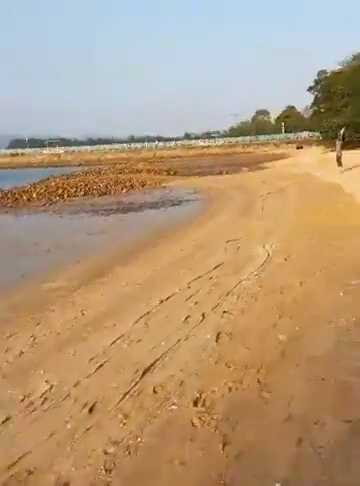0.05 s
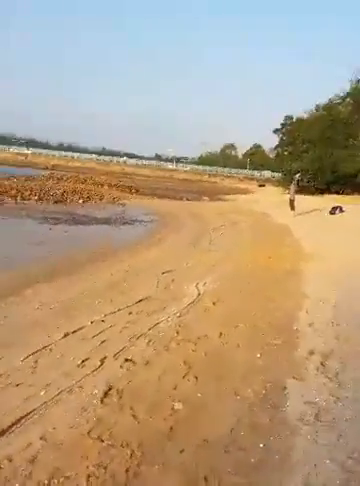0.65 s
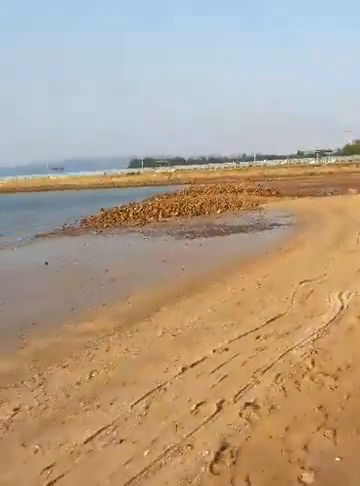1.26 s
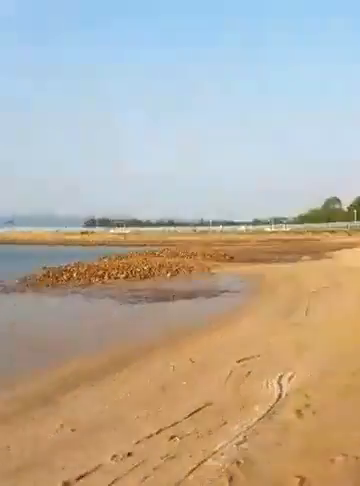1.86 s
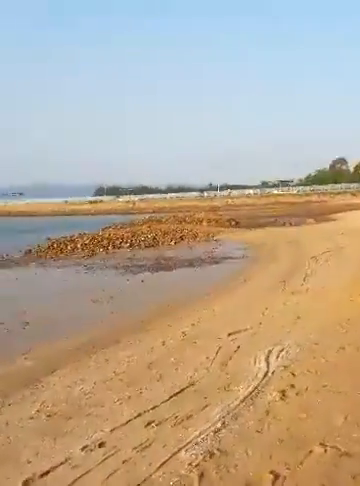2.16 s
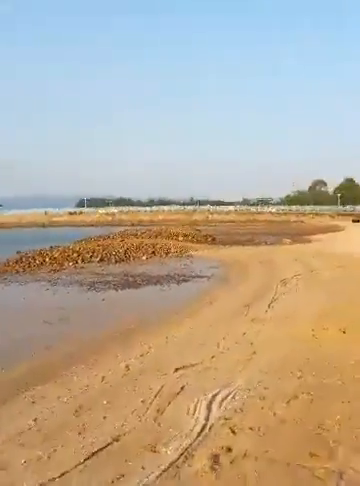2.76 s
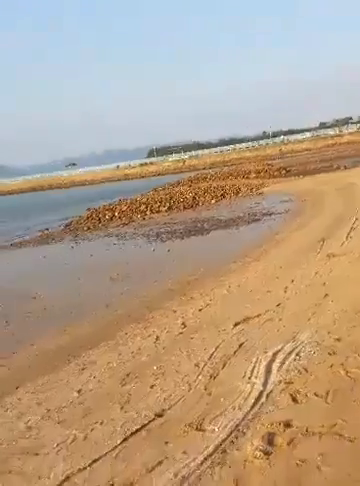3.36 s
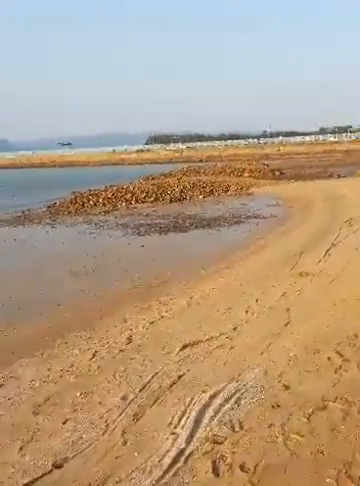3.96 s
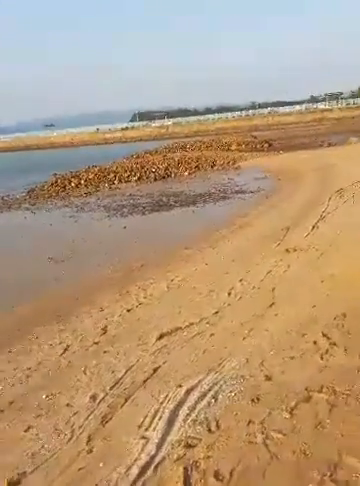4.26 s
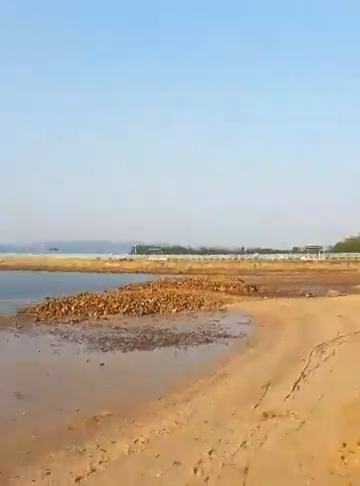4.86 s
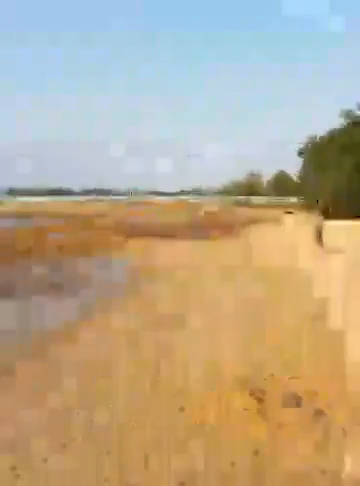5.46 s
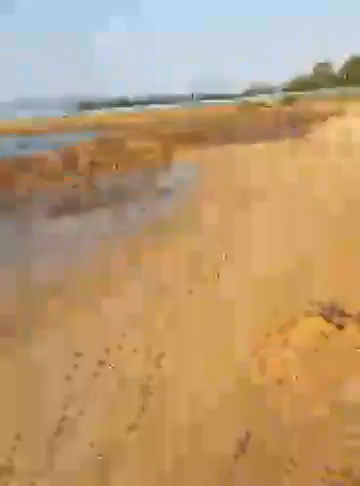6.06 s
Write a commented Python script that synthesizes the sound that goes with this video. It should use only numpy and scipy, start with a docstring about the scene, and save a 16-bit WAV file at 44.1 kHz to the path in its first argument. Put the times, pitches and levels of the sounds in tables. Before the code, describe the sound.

Footsteps cross coarse beach sand, each giving a short, grainy crunch with small snaps. The stride jolts the handheld phone, so dull, close knocks and thumps come unevenly throughout and stand out as the loudest sounds. A light breeze rumbles on the microphone over a faint, even hiss. Near the end the hiss drops and the wind eases. The open air has no echo.

```python
"""A walk along a beach of coarse sand, phone in hand, a light breeze rumbling on the microphone over hiss.
From 0.2 s on, jolts of the stride knock dully on the case and bounce it in the hand, while sand
gives way in short swells of grains with sharp snaps. The hardest knocks fall near 2.0, 4.3, 5.2, 5.5 s.
At 5.5 s the hiss sinks and stays down; at 6.1 s, as the breeze fades, a far bird calls two faint notes."""
import sys
import numpy as np
from scipy import signal
from scipy.fft import rfft, irfft
from scipy.io import wavfile
from scipy.ndimage import uniform_filter1d, minimum_filter1d

SR = 44100
rng = np.random.default_rng(int(sys.argv[2]) if len(sys.argv) > 2 else 0)


def transcribe(signal):
    """Save signal, clipped to [-1, 1], as a 16-bit WAV file at the path in sys.argv[1]."""
    frames = np.atleast_2d(signal).T
    limited = np.clip(frames, -1, 1)
    pcm = np.round(limited * 32767).astype(np.int16)
    wavfile.write(sys.argv[1], SR, pcm)


N = 273861
TIME_S = np.arange(N) / SR

# jolts of the stride: t/s, strength/dB, contact corner/Hz (low = soft), grip (factor on bounce pitch)
JOLTS = [(0.1845, -15, 1102, .91), (0.311, -21, 450, 0.94), (0.348, -21.5, 330, 0.5),
         (0.521, -29, 600, 1.35), (0.715, -23.5, 200, .5), (1.2288, -7.5, 1770, 0.94),
         (1.4803, -16, 910, 0.97), (1.6764, -9.5, 1900, 1.02), (1.9828, -13, 330, 0.91),
         (2.0106, -1, 3040, 1.03), (2.1198, -15.5, 590, 0.75), (2.271, -15.5, 800, 0.96),
         (2.284, -20, 540, 1.43), (2.473, -14, 800, 1.03), (2.777, -13.5, 483, 0.75),
         (2.8097, -14, 12300, 1), (2.829, -4.5, 1820, 1.01), (2.872, -4.5, 340, 0.82),
         (3.007, -12, 298, 0.63), (3.034, -9, 3770, 0.95), (3.041, -5.5, 330, 0.48),
         (3.2685, -12.5, 1400, 1), (3.6770, -10.5, 1000, 0.95), (4.171, -18, 520, 0.93),
         (4.2690, -0.5, 11300, 1), (4.3237, -15.5, 1210, .94), (4.6703, -17, 700, 0.92),
         (4.682, -17.5, 800, 2.14), (5.0061, -10.5, 864, 1.08), (5.054, -14.5, 400, .5),
         (5.163, -18.5, 724, 0.77), (5.2050, -1.1, 5700, 1), (5.235, -13, 300, 0.85),
         (5.496, 1, 5440, 1.21), (5.534, -7.5, 1490, 0.86), (6.069, -18, 295, 0.59)]


def case_knocks(sway_db=16.5, soft_sway_db=17.5, soft_hz=700, spread_hz=2400, size=8192):
    """Each jolt rings the phone; soft contact omits the upper modes, a firm grip quickens the bounce."""
    # case modes: f/Hz, width/Hz, level/dB, direction at the microphone (+-1)
    case_modes = [(352, 36.4, 24.5, 1), (511, 64, 19, 1), (623, 95, 25, 1), (818, 130, 19.5, 1),
                  (1140, 1100, -6, -1), (1350, 97, 11, -1), (1820, 1350, 3.5, -1), (2530, 210, 3, 1)]
    # bounce in the hand: f/Hz, width/Hz, level/dB, direction at the microphone (+-1)
    hand_modes = [(183.4, 91.3, 42, 1), (201.8, 117.3, 35.5, -1)]
    f = np.fft.rfftfreq(size, 1 / SR)
    # the port leaks slow pressure; the hand damps the top
    port = signal.freqs(*signal.butter(2, 91, "high", analog=True), f)[1] ** 2
    damping = undb(-22) + 1 / np.sqrt(1 + (f / 4200) ** 20)
    # high waves outrun low ones in the thin shell
    dispersion = (spread_hz - 1j * f) / (spread_hz + 1j * f)
    node = 1 - resonance(f, hz=2200, width_hz=260)  # microphone near a node of the case
    case = modal_response(f, case_modes)
    arm = resonance(f, hz=58, width_hz=50)
    lead = size // 8
    out = np.zeros(N + size)
    for t_s, strength_db, contact_hz, grip in JOLTS:
        push = undb(strength_db) / (1 + .5 * (f / contact_hz) ** 2) ** 4
        body = port * node * dispersion * (modal_response(f, hand_modes, grip) + case)
        softness = 1 / (1 + (contact_hz / soft_hz) ** 2)
        sway = undb(sway_db + soft_sway_db * softness) * arm  # slow pushes move the whole arm
        knock = irfft(push * damping * (body + sway))
        start = int(t_s * SR) - lead
        out[start:start + size] += np.roll(knock, lead)
    return out[:N]


def sand_crunches(half_s=0.0088, skirt_db=-14, shuffle_db=-63, crack_db=17.5, jitter_s=0.000984):
    """Fine grains slip in a swell, two coarse ones crack, one snaps; loose sand shuffles between steps."""
    # sand giving way: snap t/s, snap peak/dB, grain level/dB, lead of the swell/s
    crunches = [(0.2737, -14, -39.5, .013), (0.4620, -14, -41.5, 0.01), (0.791, -46, -59.5, 0),
                (1.2838, -33, -47.5, 0.00058), (1.9113, -16, -48, 0.02), (2.1512, -19.5, -41, 0.021),
                (2.3187, -24, -44.5, 0), (2.6158, -23, -46.5, 0.0087), (2.9036, -24.5, -42, .009),
                (3.046, -30, -46, 0.0047), (3.7086, -20, -43, 0.0034), (3.7255, -20, -62, 0.006),
                (3.9931, -28, -54.5, 0.00067), (4.1399, -19, -53, .012), (4.6960, -14.5, -41, 0.014),
                (5.0838, -13.5, -38, 0.0076), (5.3867, -27.5, -51.5, .004), (5.4160, -26, -69, 0.015),
                (5.8330, -34.5, -53.5, 0.0038), (6.0027, -18.5, -43, 0.0058)]
    # snap spectrum: f/Hz, level/dB
    snap_spectrum = [(30, -26.5), (100, 4), (210, 3), (400, -2.5), (1000, -12), (2500, -19), (6000, -40),
                     (10000, -38), (14000, -65)]
    # grain spectrum: f/Hz, level/dB
    grain_spectrum = [(40, 8.5), (200, 4), (700, -4), (1500, -9.5), (3000, -15), (6000, -23.5),
                      (14000, -30)]
    crack_offsets_s = np.array([-.003, .003])
    envelope = undb(shuffle_db + drift(rate_hz=9))
    snaps = np.zeros(N)
    for t_s, snap_db, grain_db, lead_s in crunches:
        middle_s = t_s - lead_s
        skirt = undb(skirt_db) * swell(middle_s, 4.2 * half_s)
        envelope += undb(grain_db) * (swell(middle_s, half_s) + skirt)
        cracks_s = middle_s + crack_offsets_s + jitter_s * rng.standard_normal(2)
        snaps[(cracks_s * SR).astype(int)] += undb(grain_db + crack_db)
        snaps[int(t_s * SR)] += undb(snap_db)
    grains = unit_rms(colour(clicks(per_s=9000, spread_db=5), grain_spectrum))
    return envelope * grains + colour(snaps, snap_spectrum)


def breeze(rumble_db=-1, flutter_db=3.5, puff_db=-4, swing_db=-46, swing_half_s=0.044):
    """Eddies rumble on the port, more as the hand swings through a jolt; some break off as dull puffs."""
    # breeze on the microphone: t/s, level/dB
    breeze_levels = [(0.0, -62), (0.26, -49.5), (0.97, -54.5), (2.16, -44), (2.39, -50.5), (2.97, -44),
                     (3.22, -53), (3.92, -51.5), (4.1, -49.5), (4.58, -50), (5.29, -49), (6.21, -60.5)]
    # rumble spectrum: f/Hz, level/dB
    rumble_spectrum = [(15, -11.5), (35, 1), (65, 3), (120, -5), (220, -12.5), (400, -19.5), (900, -26.5),
                       (2500, -36.5), (8000, -45)]
    # puff spectrum: f/Hz, level/dB
    puff_spectrum = [(30, -9), (160, -1), (300, -7.5), (600, -24.5), (1200, -37), (4000, -67)]
    breeze_db = np.interp(TIME_S, *np.transpose(breeze_levels))
    swing_power = sum(undb(swing_db + 0.43 * strength_db) ** 2 * swell(t_s, swing_half_s)
                      for t_s, strength_db, _, _ in JOLTS)
    flow = np.sqrt(undb(breeze_db) ** 2 + swing_power)
    rumble = unit_rms(colour(rng.standard_normal(N), rumble_spectrum))
    rumble *= undb(rumble_db + flutter_db * drift(rate_hz=21.99))
    puffs = unit_rms(colour(clicks(per_s=45, spread_db=-1), puff_spectrum))
    return flow * (rumble + undb(puff_db) * puffs)


def shore_hiss(level_db=-58, drop_at_s=5.49, drop_db=-4, fade_s=0.015):
    """Smooth hiss of the open shore and the microphone, stepping down once."""
    # hiss spectrum: f/Hz, level/dB
    hiss_spectrum = [(60, -3), (400, 8), (1000, 3.5), (2500, 1), (5000, -5), (9000, -6), (14000, -6)]
    dropped = np.clip((TIME_S - drop_at_s) / fade_s, 0, 1)
    hiss = unit_rms(colour(rng.standard_normal(N), hiss_spectrum))
    return hiss * undb(level_db + drop_db * dropped)


def far_bird(width_hz=160):
    """Thin notes blurred by distance: swells of narrow-band noise."""
    # notes: middle t/s, f/Hz, level/dB, half length/s
    notes = [(6.112, 2430, -69, .02), (6.175, 2410, -63, 0.02)]
    f = np.fft.rfftfreq(N, 1 / SR)
    noise_spectrum = rfft(rng.standard_normal(N))
    out = np.zeros(N)
    for t_s, hz, level_db, half_s in notes:
        band = irfft(noise_spectrum * resonance(f, hz, width_hz) ** 2, N)
        out += undb(level_db) * swell(t_s, half_s) * unit_rms(band)
    return out


def undb(db):
    """Decibels to gain."""
    return 10 ** (np.asarray(db) / 20)


def unit_rms(x):
    """Scale to rms 1."""
    return x / np.std(x)


def swell(middle_s, half_s):
    """Gaussian rise and fall, peak 1."""
    return np.exp(-.5 * ((TIME_S - middle_s) / half_s) ** 2)


def drift(rate_hz):
    """Random steps, smoothed twice; spread near 1."""
    hold = int(SR / rate_hz)
    steps = np.repeat(rng.standard_normal(N // hold + 1), hold)
    return 1.3 * uniform_filter1d(uniform_filter1d(steps, hold), hold)[:N]


def clicks(per_s, spread_db):
    """Impulses of random time and size."""
    present = rng.random(N) < per_s / SR
    return present * rng.standard_normal(N) * undb(spread_db * np.minimum(rng.exponential(size=N), 4))


def resonance(f, hz, width_hz):
    """Response of one damped mode, gain 1 at its centre."""
    return 1j * f * width_hz / (hz ** 2 - f ** 2 + 1j * f * width_hz)


def modal_response(f, modes, stretch=1):
    """Signed sum of modes, pitches scaled by stretch."""
    return sum(sign * undb(db) * resonance(f, hz * stretch, width_hz) for hz, width_hz, db, sign in modes)


def colour(x, spectrum, size=4096):
    """Minimum-phase filter from (f/Hz, level/dB) rows; impulse response peaks at 1."""
    hz, db = np.transpose(spectrum)
    f = np.maximum(np.fft.rfftfreq(size, 1 / SR), 1)
    gain = undb(np.interp(np.log(f), np.log(hz), db))
    cepstrum = irfft(np.log(gain))
    cepstrum[1:size // 2] *= 2
    cepstrum[size // 2 + 1:] = 0
    impulse = irfft(np.exp(rfft(cepstrum)))
    return signal.fftconvolve(x, impulse / np.abs(impulse).max())[:N]


def scene():
    """Open air, mono: nothing echoes."""
    return (case_knocks() + sand_crunches() + breeze() + shore_hiss() + far_bird())[None]


def record(dry):
    """The phone limits the hardest knocks and cuts the top steeply."""
    ceiling, hold_samples, top_hz = .68, 20, 14000
    gain = ceiling / np.maximum(np.abs(dry), ceiling)
    gain = uniform_filter1d(minimum_filter1d(gain, hold_samples), hold_samples)
    lowpass = signal.ellip(10, .1, 70, top_hz, fs=SR, output="sos")
    return signal.sosfilt(lowpass, dry * gain)


dry = scene()
out = record(dry)
transcribe(out)
```